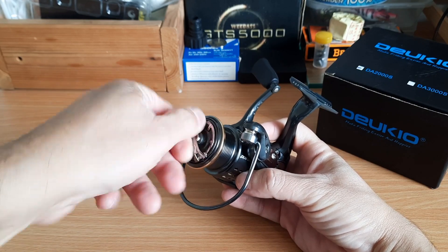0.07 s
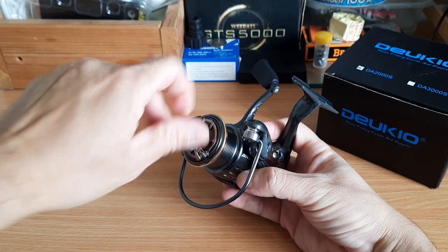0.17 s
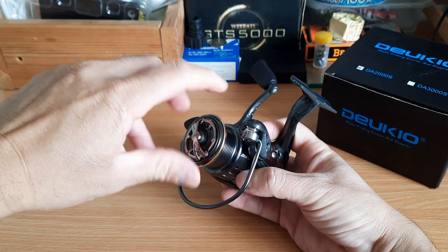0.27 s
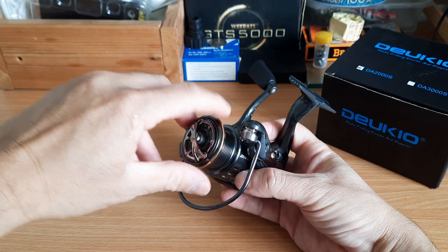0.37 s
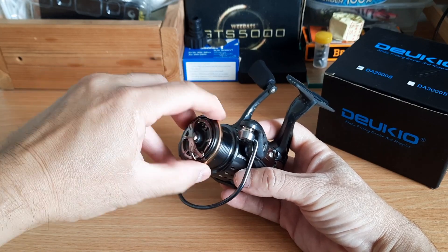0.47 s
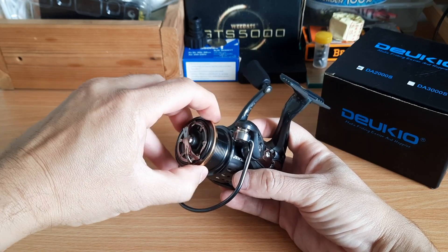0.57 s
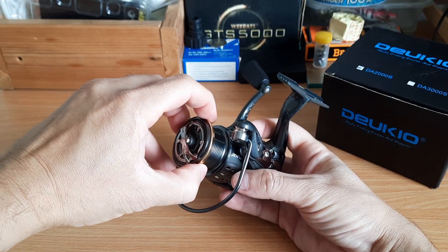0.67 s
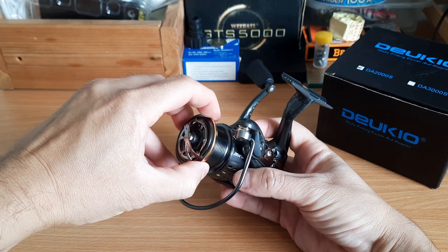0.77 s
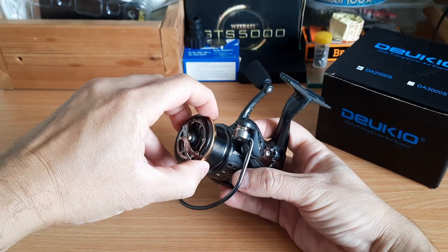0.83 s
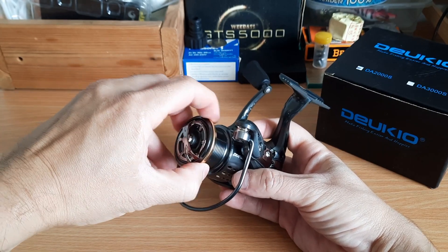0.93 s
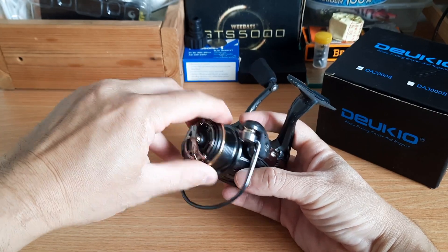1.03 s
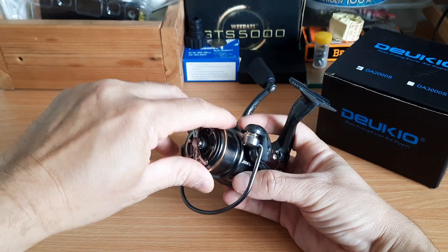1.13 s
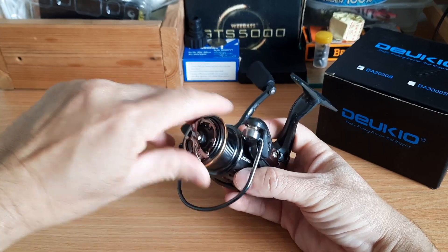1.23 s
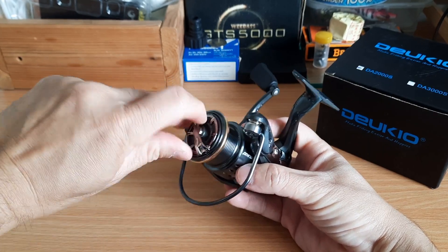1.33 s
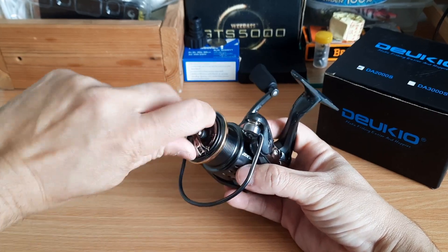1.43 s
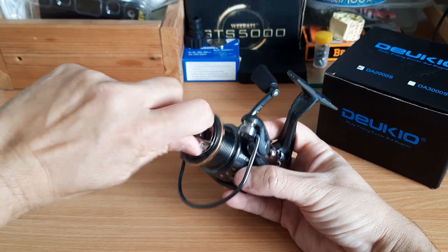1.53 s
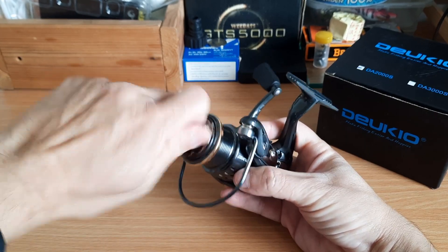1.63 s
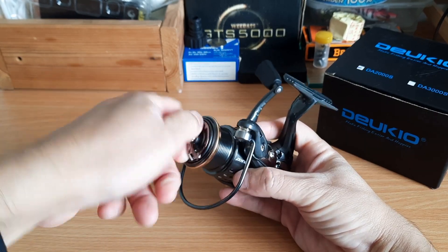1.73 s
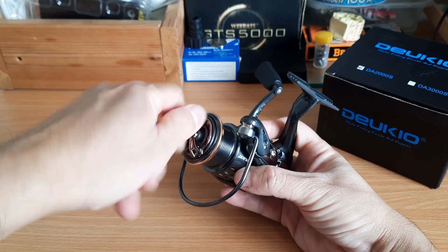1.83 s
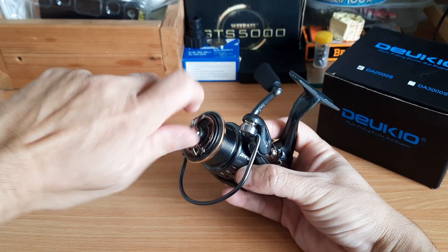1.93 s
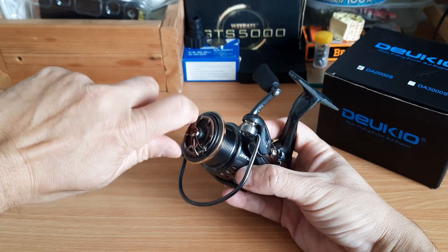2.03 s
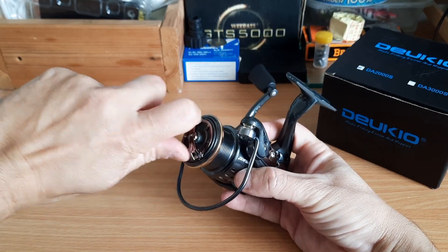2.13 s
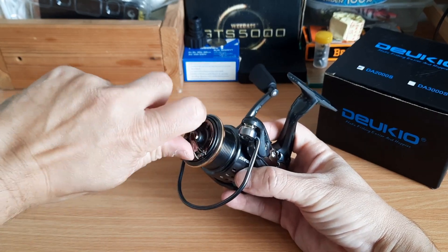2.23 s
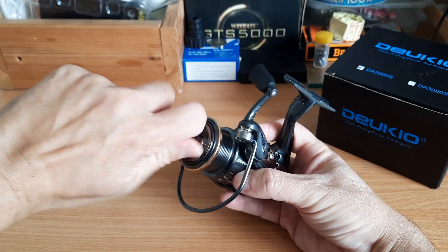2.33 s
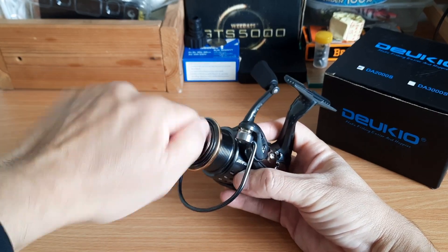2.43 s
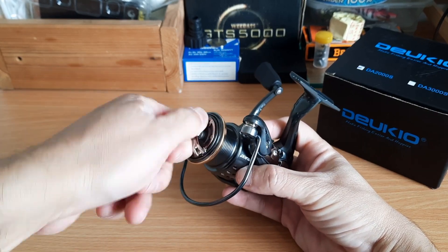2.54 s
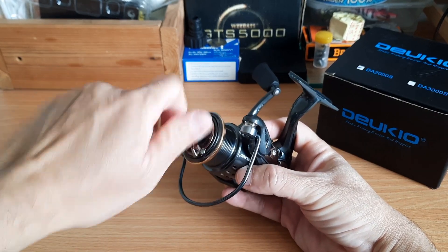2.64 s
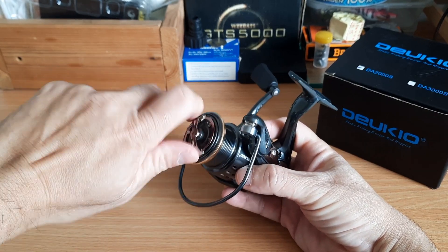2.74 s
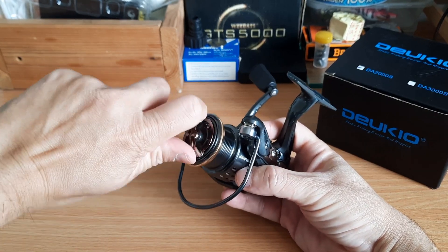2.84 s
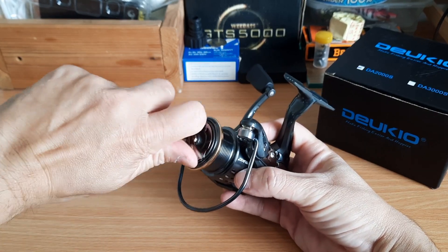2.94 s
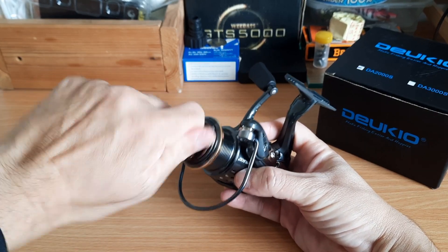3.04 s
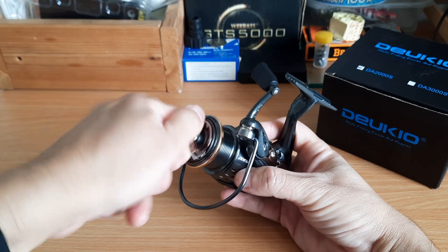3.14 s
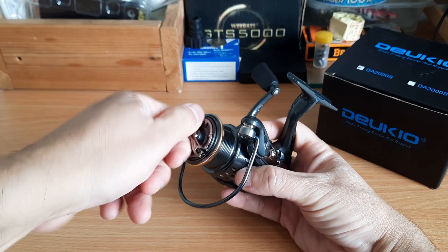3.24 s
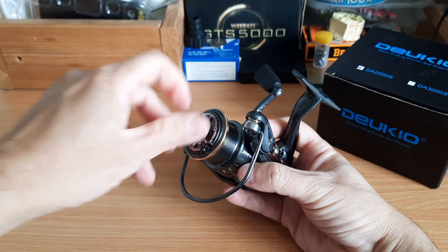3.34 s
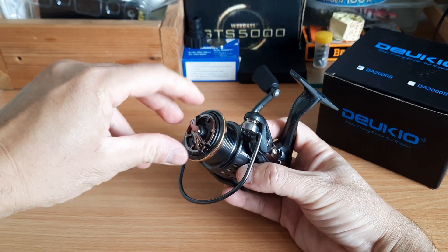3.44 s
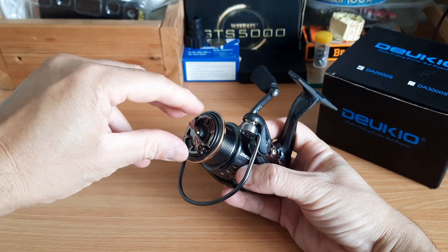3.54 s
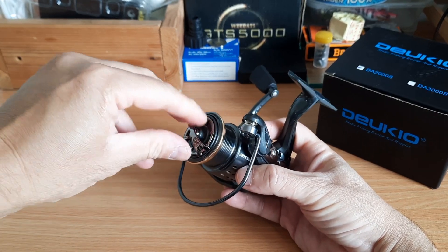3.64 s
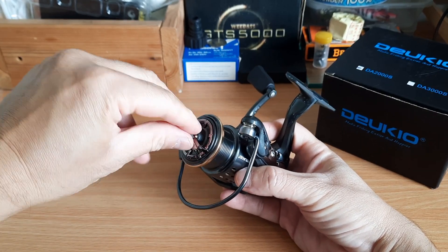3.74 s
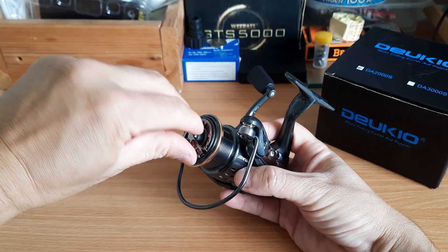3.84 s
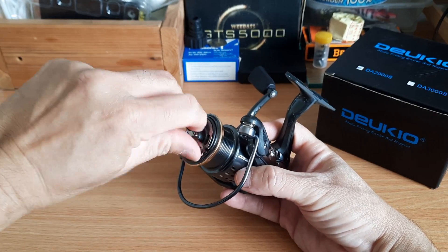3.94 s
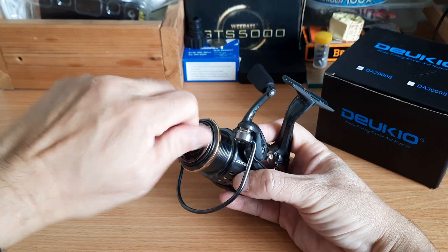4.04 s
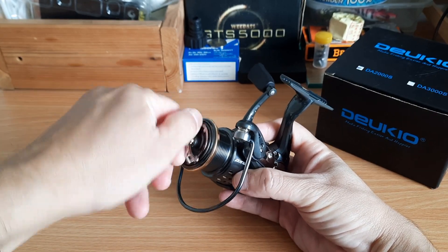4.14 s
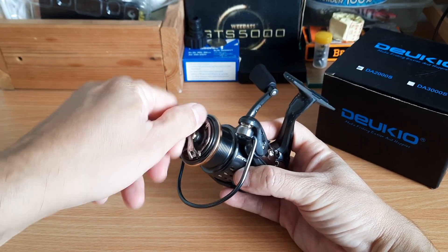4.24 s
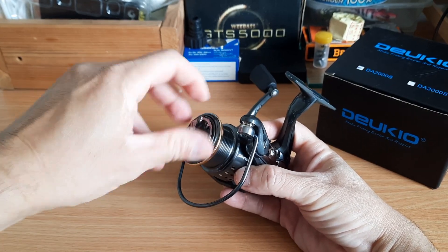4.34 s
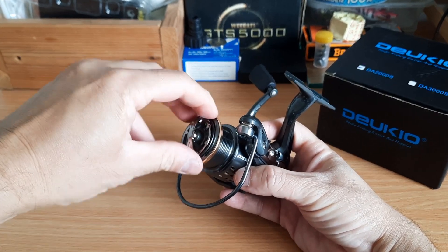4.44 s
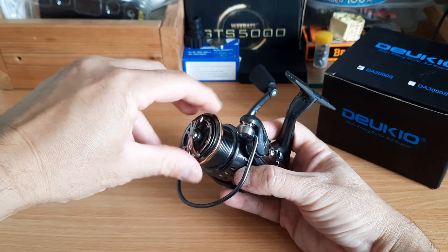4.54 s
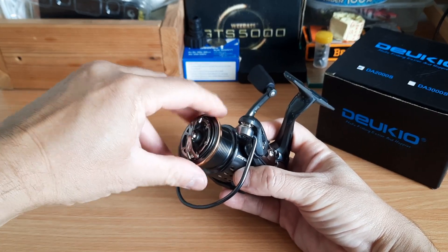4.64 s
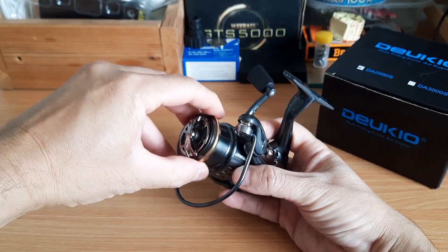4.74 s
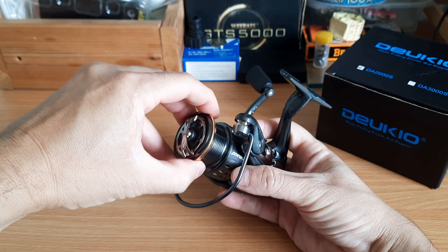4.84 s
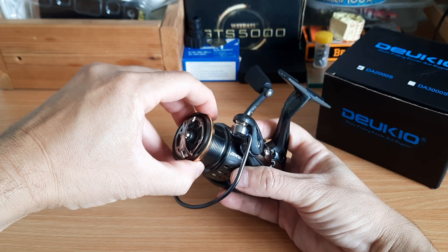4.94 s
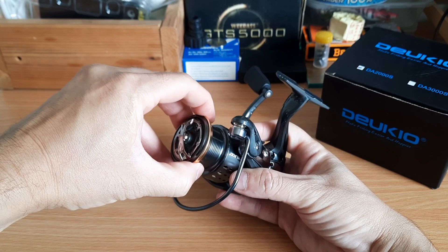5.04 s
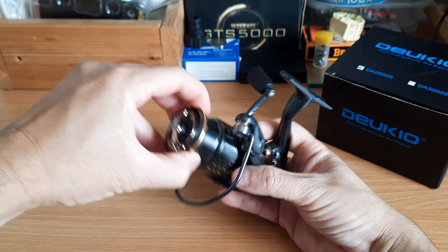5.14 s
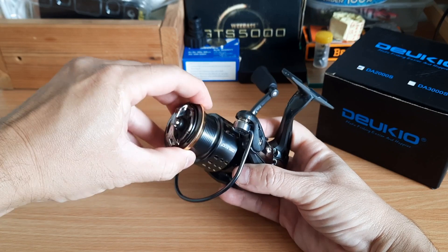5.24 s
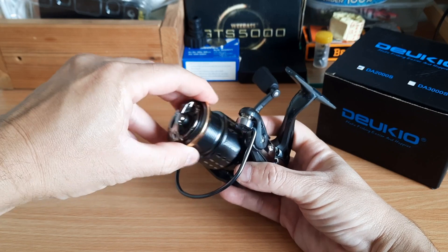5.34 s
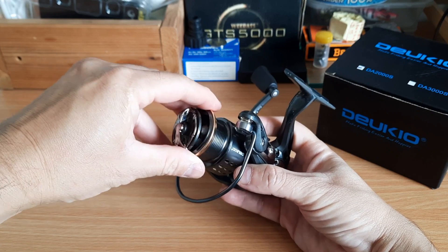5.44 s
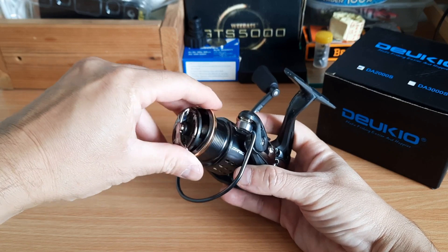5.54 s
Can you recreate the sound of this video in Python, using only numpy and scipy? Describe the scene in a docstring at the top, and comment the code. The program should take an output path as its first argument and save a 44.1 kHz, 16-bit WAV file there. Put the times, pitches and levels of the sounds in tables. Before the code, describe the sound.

A fishing reel is handled very close to a stereo phone microphone in a small, quiet room. A single sharp click lands at 0 s, its short room tail dying away. Light finger taps on the spool follow at about 0.5, 0.7, 1.05 and 1.3-1.45 s. The knob's clicker then runs in quick bursts of roughly a dozen dry, bright, noisy snaps, slightly uneven: 1.6-1.8, 2.35-2.55, 3.0-3.2 and 4.0-4.15 s. The second has a heavier thud mid-run. Faint knocks fall between bursts. A small double knock comes near 4.8 s, then from 5.1 to 5.47 s the spool rattles in irregular hollow metallic knocks, strongest around 5.16 and 5.43 s, leaving a thin high ring. Beneath everything are a low rumble with gentle bass swells, a soft hiss swelling mostly left, and a barely audible tick ten times a second at left.

```python
"""Fishing reel clicking in the hands

A fishing reel is held close to a two-microphone phone in a small quiet room. Its drag knob is turned in short
twists, a spring clicking over the teeth; between twists fingers knock and rock the metal spool. Clicks are noisy
snaps plus thuds of the body, knocks are thuds plus cracks of noise, and a few knocks leave the rim ringing.
Shaped noise makes a steady rumble with a hump near 310 Hz, whose bass swells at times, and a soft hiss that swells
too. Something close to the left microphone ticks faintly about ten times a second."""
import sys
import numpy as np
from scipy import signal
from scipy.fft import rfft, irfft
from scipy.io import wavfile
from scipy.ndimage import uniform_filter1d

SR = 44100
rng = np.random.default_rng(int(sys.argv[2]) if len(sys.argv) > 2 else 0)


def bounce(signal):
    """Save signal as a 16-bit WAV file at the path given by the first command-line argument."""
    frames = np.transpose(np.atleast_2d(signal))
    limited = np.clip(frames, -1, 1)
    pcm = np.round(limited * 32767).astype(np.int16)
    wavfile.write(sys.argv[1], SR, pcm)


N = 246950  # length [samples]

# the spring snapping over a tooth: (time [s], snap level [dB], reel body level [dB])
CLICKS = [(0.0056, -15, -46), (1.5769, -24, -45.5), (1.5911, -20, -44), (1.6061, -17, -47.5),
          (1.6223, -16, -45), (1.654, -14.5, -40.5), (1.6804, -13.5, -42), (1.6991, -14.5, -45.5),
          (1.714, -14, -51), (1.7266, -12, -44), (1.7391, -18, -41.5), (1.755, -14.5, -40),
          (1.7746, -13.5, -47), (1.8176, -14, -49), (2.3624, -25, -43.5), (2.3798, -21, -42.5),
          (2.394, -19, -44.5), (2.408, -17, -43), (2.4223, -15.5, -39.5), (2.441, -15.5, -43),
          (2.4584, -14.5, -34), (2.4739, -12.5, -23.5), (2.4877, -14.5, -34.5), (2.5012, -17, -35.5),
          (2.5162, -16.5, -40), (2.5375, -16, -48.5), (3.009, -23, -56.5), (3.0203, -20, -46),
          (3.0323, -17.5, -48.5), (3.044, -16.5, -44), (3.061, -17.5, -42), (3.0853, -16.5, -41.5),
          (3.1089, -15.5, -41), (3.1247, -15, -45), (3.1374, -14, -48.5), (3.1486, -18, -40),
          (3.1618, -15, -41.5), (3.1773, -14, -51), (3.1987, -14.5, -49), (3.9917, -24, -49.5),
          (4.0219, -18.5, -56), (4.0379, -16, -53), (4.0506, -15, -49), (4.064, -17.5, -41.5),
          (4.0793, -17.5, -37), (4.097, -15, -35), (4.112, -12, -33), (4.1256, -14.5, -44),
          (4.1412, -14, -45.5), (4.162, -14.5, -43.5)]
# the spool knocking against fingers and shaft:
# (time [s], reel body level [dB], body pitch [Hz], crack level [dB], treble level [dB])
KNOCKS = [(0.512, -60, 1930, -49.5, -67), (0.6832, -56, 1840, -49, -60), (0.694, -52, 2000, -51, -63),
          (1.045, -47.5, 1970, -55, -64), (1.0555, -42.5, 1810, -38, -61), (1.0585, -42, 2390, -33.5, -48),
          (1.272, -49, 2060, -44.5, -68), (1.2844, -51.5, 2050, -45.5, -67), (1.3716, -48, 1950, -59, -73),
          (1.3754, -49, 2170, -58, -74), (1.4593, -45, 2130, -63, -74), (1.9014, -45.5, 2080, -38.5, -54),
          (2.0777, -59, 1970, -64, -77), (2.1602, -51.5, 2080, -64, -79), (2.779, -53, 1800, -42.5, -60),
          (3.8548, -54.5, 2050, -73, -80), (4.7553, -56, 2380, -50, -71), (4.7978, -39.5, 2150, -34.5, -51),
          (4.7998, -36.5, 1990, -44, -55), (4.8129, -37.5, 2010, -35, -53), (5.1318, -38, 2000, -38, -55),
          (5.1351, -32, 1930, -33, -48), (5.1478, -34, 1850, -37, -49), (5.1526, -32, 2080, -34, -37),
          (5.1615, -27, 2020, -19, -26), (5.1657, -34.5, 1650, -26.5, -37), (5.1801, -32.5, 1900, -44, -37),
          (5.2056, -36.5, 2530, -22.5, -38), (5.2601, -32.5, 1780, -36.5, -51),
          (5.279, -36.5, 1780, -40, -49), (5.299, -38, 1830, -33, -52), (5.305, -35, 2040, -47, -56),
          (5.386, -52, 1820, -47, -74), (5.4042, -33, 2020, -25, -44), (5.4068, -36, 1930, -35, -46),
          (5.4276, -19, 2007, -25.5, -35.5), (5.4693, -42, 2260, -38, -47)]
# swells of rumble and hiss; at 0.0 s the hiss is the dying room tail of clicks just before:
# (time of the strongest moment [s], swell of the rumble [dB], swell of the hiss [dB])
SWELLS = [(0.0, 10.5, 28), (0.64, 2.5, 6), (1.28, 5, 6), (1.78, 4.5, 11), (2.55, 8, 18), (3.24, 9, 9),
          (4.18, 6.5, 19), (5.29, 6.5, 4), (5.49, 5.5, 20)]
BODY_RISE_S = 0.0012  # time for a thud to reach its peak


def undb(db):
    """Turn decibels into a plain multiplier."""
    return 10 ** (np.asarray(db) / 20)


def shape(points, hz):
    """Read a (frequency [Hz], level [dB]) table along a logarithmic frequency axis."""
    table_hz, db = np.transpose(points)
    return np.interp(np.log(hz + 1), np.log(table_hz), db)


def colour(x, points):
    """Give a sound the tone in a table, with a filter that never answers before its input (folded cepstrum)."""
    hz = np.fft.rfftfreq(1024, 1 / SR)
    cepstrum = irfft(np.log(undb(shape(points, hz))))
    # folding the second half onto the first puts the whole response after the blow
    cepstrum[1:512] *= 2
    cepstrum[513:] = 0
    response = irfft(np.exp(rfft(cepstrum)))
    return signal.fftconvolve(x, response)[:N]


def band(x, lo_hz, hi_hz):
    """Keep mainly the frequencies between two limits."""
    sos = signal.butter(2, [lo_hz, min(hi_hz, .45 * SR)], "band", fs=SR, output="sos")
    return signal.sosfilt(sos, x)


def blows(s, db, pan_db):
    """Place one impulse per event in each channel; pan_db is left minus right."""
    x = np.zeros((2, N))
    place = np.round(s * SR).astype(int)
    size = undb(db + np.array([pan_db, -pan_db]) / 2)
    np.add.at(x, (slice(None), place), size)
    return x


def fade(x, t60):
    """Turn each impulse into a decay that falls 60 dB in t60 seconds."""
    return signal.lfilter([1], [1, -np.exp(-np.log(1000) / (t60 * SR))], x)


def hump_up(x, rise):
    """Turn each impulse into a hump that peaks at its own size after rise seconds."""
    p = np.exp(-1 / (rise * SR))
    return signal.lfilter([0, np.e / (rise * SR)], [1, -2 * p, p * p], x)


def rattle(envelope):
    """Put separate noise at each microphone port, as loud as the envelope says."""
    return envelope * rng.standard_normal((2, N))


def swell_curve(s, db, rise_s, fall_s):
    """Add up the swells in dB, each rising to a peak and falling away."""
    late = np.arange(N) / SR - s[:, None]
    return db @ np.exp(np.where(late < 0, late / rise_s, -late / fall_s))


def rumble():
    """Room noise, alike at both ports in the bass and unlike above; only the bass swells."""
    # tone of the rumble: (frequency [Hz], relative level per Hz [dB])
    tone = [(22, -50.5), (38, -20), (58, -10.5), (75, -32), (107, -8.5), (173, -10), (260, -12), (310, 2.5),
            (453, -11), (790, -18), (1490, -26.5), (2460, -36.5), (4410, -50.5), (7310, -54),
            (16000, -45.5)]
    # difference between the ports: (frequency [Hz], side minus mid [dB])
    side_table = [(60, -7), (110, -10), (200, -16.5), (380, -11.5), (700, -0.5), (1290, 3), (2380, -1.5),
                  (4400, -0.5), (8120, 3), (15000, -2)]
    # balance of the ports: (frequency [Hz], left minus right [dB])
    pan_table = [(60, 0), (110, 0.5), (200, -2.5), (380, 2.5), (700, 2), (1290, 6), (2380, 2.5),
                 (4400, 10.5), (8120, -3), (15000, 4)]
    rest_db, rise_s, fall_s = -58.5, 0.21, 0.078  # bass level between swells, and the swell times
    upper_db = -57.5  # gain of the part that does not swell

    hz = np.fft.rfftfreq(N, 1 / SR)
    mid, side = rfft(rng.standard_normal((2, N))) * undb(shape(tone, hz))
    side = side * undb(shape(side_table, hz))
    pan_db = shape(pan_table, hz)
    x = np.array([mid + side, mid - side]) * undb(np.array([pan_db, -pan_db]) / 2)
    # gentle split: the two parts are equal at 800 Hz
    bass_share = 1 / (1 + (hz / 800) ** 2)
    bass = irfft(x * bass_share, N)
    upper = irfft(x * (1 - bass_share), N)
    s, db, _ = np.transpose(SWELLS)
    swelling_bass = bass * undb(rest_db + swell_curve(s, db, rise_s, fall_s))
    # both parts are scaled so that the bass between swells sits at rest_db
    return (swelling_bass + upper * undb(upper_db)) / np.std(bass.mean(0))


def soft_hiss():
    """A narrow band of noise, mostly at the left port, that swells and falls back."""
    rest_db, rise_s, fall_s = -74, 0.088, 0.088  # gain between swells, and the swell times
    s, _, db = np.transpose(SWELLS)
    hiss = band(band(rng.standard_normal((2, N)), 3600, 6500), 3000, 7000)
    port_gain = undb([[4.0], [-3.0]])  # left, right
    return hiss * port_gain * undb(rest_db + swell_curve(s, db, rise_s, fall_s))


def clicker():
    """The spring snaps sharply off a tooth, then rattles as noise for a few milliseconds."""
    # how the snap reaches each microphone port: (frequency [Hz], level [dB])
    port_left = [(1500, -34), (2300, -5), (3500, -4), (4400, -5.5), (4950, 6), (5700, 0), (7600, -7),
                 (9000, -17.5), (10500, -2), (12000, 0), (16000, -4)]
    port_right = [(1500, -12.5), (2600, -5.5), (3900, -5.5), (5000, 2.5), (7000, 3.5), (8200, 4.5),
                  (9500, -5), (10500, -1), (12500, 5.5), (16000, 1)]
    pan_db, pan_spread_db = 1.7, 1.5  # left minus right, and how much it varies from click to click
    left_t60_s, right_t60_s = .014, .011  # time for the rattle to fall 60 dB
    rattle_db = -9  # rattle against snap

    s, snap_db, _ = np.transpose(CLICKS)
    hit = blows(s, snap_db, pan_db + pan_spread_db * rng.standard_normal(len(s)))
    envelope = np.array([fade(hit[0], left_t60_s), fade(hit[1], right_t60_s)])
    snap = hit + undb(rattle_db) * rattle(envelope)
    return np.array([colour(snap[0], port_left), colour(snap[1], port_right)])


def thud(s, db, hz, pan_db):
    """The body modes grow for two or three cycles of the main pitch and die in a few more."""
    # ways the reel body shakes: (multiple of the body pitch, level [dB])
    modes = [(.6, -19), (1, -0.5), (1.3, -9), (1.6, -16.5), (2.05, -16)]
    x, t = np.zeros((2, N)), np.arange(SR // 50) / SR
    hump = (t / BODY_RISE_S * np.exp(1 - t / BODY_RISE_S)) ** 2
    for k in range(len(s)):
        start = int(s[k] * SR)
        hard_db = 0.24 * (db[k] + 20)  # light taps wake mostly the main mode
        wave = 0
        for multiple, mode_db in modes:
            gain = undb(mode_db + hard_db * (multiple != 1))
            wave = wave + gain * np.sin(2 * np.pi * multiple * hz[k] * t)
        port_db = db[k] + np.array([[pan_db[k]], [-pan_db[k]]]) / 2
        x[:, start:start + len(t)] += undb(port_db) * hump * wave
    return x


def body(lean_db):
    """The hand-damped reel body thuds at clicks and knocks, mostly toward the left port."""
    base_hz = 2200  # pitch for a click of -41 dB, before a small random change
    click_pan_db, knock_pan_db = 12.5, 9.5  # left minus right
    s, _, db = np.transpose(CLICKS)
    # harder blows reach the lower, heavier parts of the body
    hz = base_hz * (1 - .005 * (db + 41)) * (1 + .02 * rng.standard_normal(len(s)))
    clicks = thud(s - BODY_RISE_S / 2, db, hz, np.full(len(s), click_pan_db))
    s, db, hz, _, _ = np.transpose(KNOCKS)
    return clicks + thud(s, db, hz, knock_pan_db + lean_db)


def room(x):
    """Walls and a nearby box answer with an echo and a diffuse tail that builds up, then fades.
    The reel never rests in the hands, so four reflection patterns take turns at random."""
    # tail of the room: (middle of the band [Hz], level [dB], time to fall 60 dB [s])
    tail_bands = [(2000, -28, 0.24), (5960, -34, 0.14), (14000, -34.5, 0.21)]
    box_lag_s, box_left_db, box_right_db = .0033, -22, -9  # echo off the box
    t, out = np.arange(SR // 2) / SR, 0
    # a new pattern is drawn every 512 samples (about 12 ms)
    pose = np.repeat(rng.integers(0, 4, N // 512 + 1), 512)[:N]
    for k in range(4):
        tail = 0
        for hz, db, t60 in tail_bands:
            noise = band(rng.standard_normal((2, len(t))), hz / 2.46, hz * 1.95)
            tail = tail + undb(db - 60 * t / t60) * noise
        tail *= 1 - np.exp(-t / 0.0029)
        tail[:, int(box_lag_s * SR)] += undb((box_left_db, box_right_db))
        in_pose = uniform_filter1d(1. * (pose == k), size=200)  # smooth hand-over
        out = out + signal.fftconvolve(x * in_pose, tail, axes=1)[:, :N]
    return out


def tick():
    """A faint dry tick, a short burst of a narrow band, even in time but not in size."""
    start_s, period_s = .0796, .10239
    mean_db, spread_db, pan_db = -49, 3.5, 13.5  # impulse level, its variation, left minus right
    s = np.arange(start_s, N / SR - .01, period_s)
    db = mean_db + spread_db * rng.standard_normal(len(s))
    impulses = blows(s, db, np.full(len(s), pan_db))
    return band(band(impulses, 3900, 6800), 3300, 8000)


def cracks(lean_db):
    """The brighter part of each knock: humps of noise in a middle band and a treble band."""
    crack_pan_db, treble_pan_db = 2.5, -1  # left minus right
    rise_s = 0.0009
    s, _, _, crack_db, treble_db = np.transpose(KNOCKS)
    crack_hump = hump_up(blows(s, crack_db, crack_pan_db + lean_db), rise_s)
    crack = band(band(rattle(crack_hump), 3800, 7000), 3000, 8500)
    treble_hump = hump_up(blows(s, treble_db, treble_pan_db + lean_db), rise_s)
    treble = band(rattle(treble_hump), 9600, 15800)
    return crack + treble


def rim():
    """A few knocks leave the spool rim ringing as fading sines; its close pair of modes beats."""
    # tones of the spool rim: (frequency [Hz], time to fall 60 dB [s])
    rim_modes = [(7325, .55), (11150, .2), (11187, .08), (13380, .12)]
    # knocks that set it ringing: (time [s], then the level of each of the four rim tones [dB])
    rim_blows = [(1.06, -99, -99, -99, -60), (5.16, -62, -39, -57, -54), (5.404, -80, -70, -73, -54),
                 (5.43, -67, -75, -87, -68)]
    s, *mode_db = np.transpose(rim_blows)
    out = 0
    for (hz, t60), db in zip(rim_modes, mode_db):
        # one step of a spinning, shrinking arrow; its imaginary part is the fading sine
        pole = np.exp(2j * np.pi * hz / SR - np.log(1000) / (t60 * SR))
        hits = blows(s, db, np.full(len(s), 3.0))
        out = out + signal.lfilter([1], [1, -pole], hits).imag
    return out


def scene():
    """Add up the reel, its reflections, the hiss, the room noise and the tick."""
    knock_pan_spread_db = 1.5  # each knock leans a little left or right
    right_lag = 3  # samples by which snaps and cracks reach the right port later
    lean_db = knock_pan_spread_db * rng.standard_normal(len(KNOCKS))
    bright = clicker() + cracks(lean_db)
    bright = np.array([bright[0], np.roll(bright[1], right_lag)])
    thuds = body(lean_db)
    # the walls hear the body from all sides
    walls = room(bright + thuds.mean(0))
    return bright + thuds + rim() + walls + soft_hiss() + rumble() + tick()


def record(dry):
    """The microphones have a dip near 10 kHz; the phone cuts the deep bass and the top."""
    top_hz = 15900
    dry = dry - 0.36 * band(dry, 9600, 10430)
    dry = signal.sosfilt(signal.butter(3, 34, "high", fs=SR, output="sos"), dry)
    return signal.sosfilt(signal.ellip(8, .2, 70, top_hz, fs=SR, output="sos"), dry)


dry = scene()
out = record(dry)
bounce(out)
```